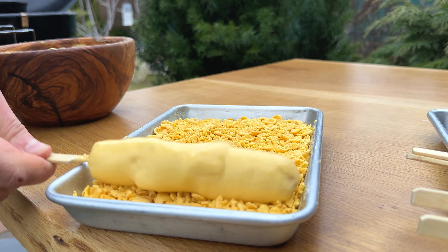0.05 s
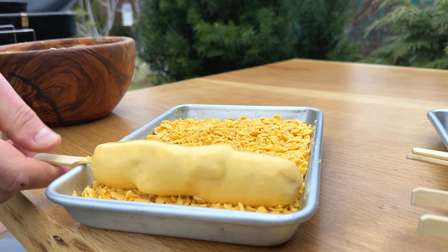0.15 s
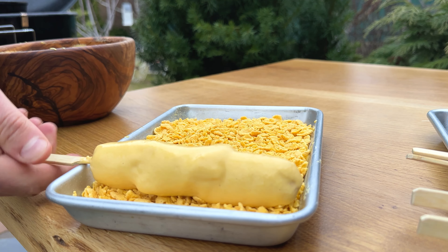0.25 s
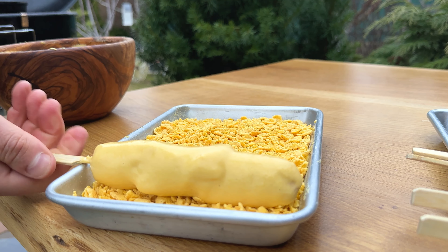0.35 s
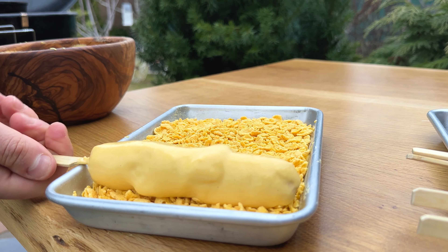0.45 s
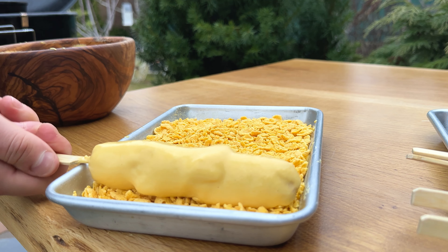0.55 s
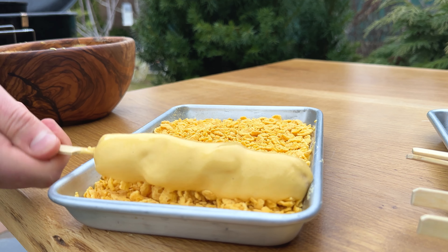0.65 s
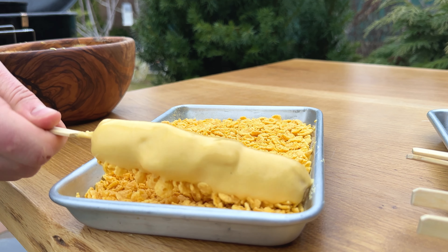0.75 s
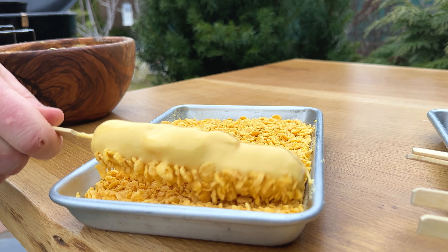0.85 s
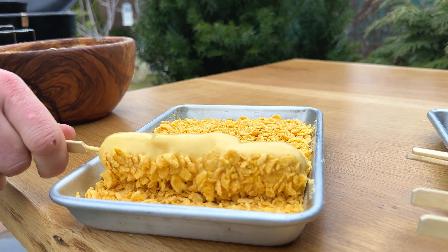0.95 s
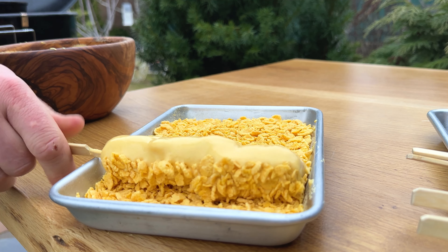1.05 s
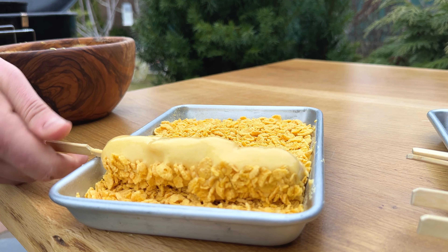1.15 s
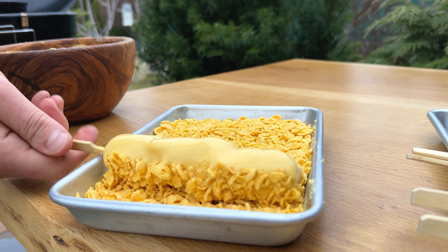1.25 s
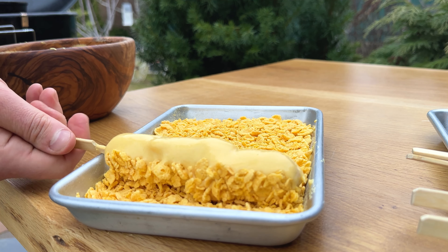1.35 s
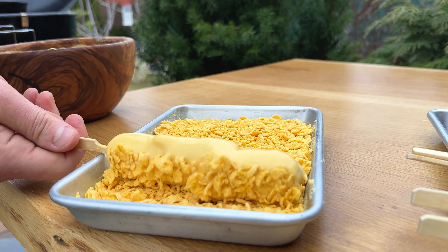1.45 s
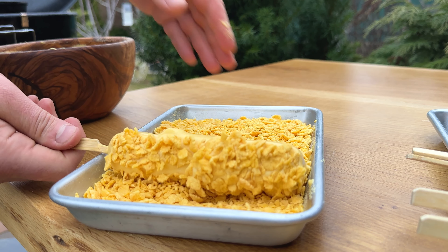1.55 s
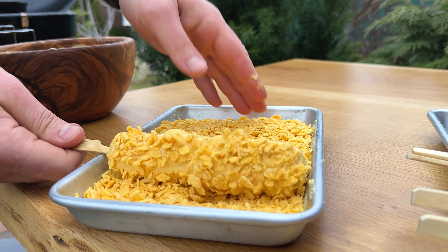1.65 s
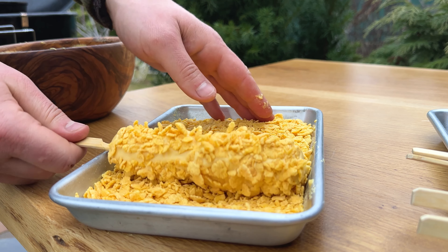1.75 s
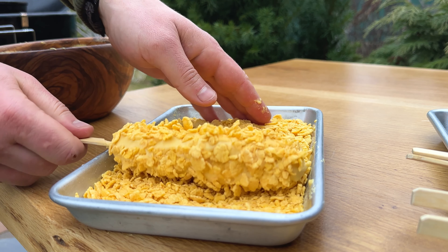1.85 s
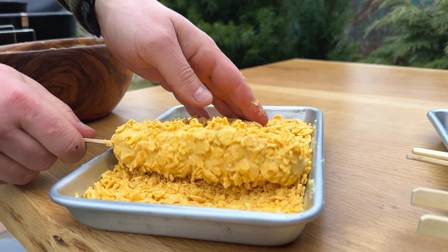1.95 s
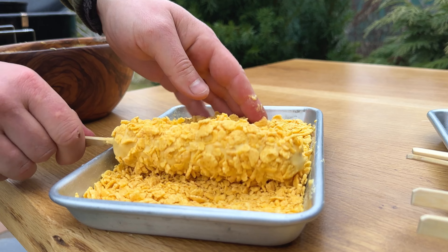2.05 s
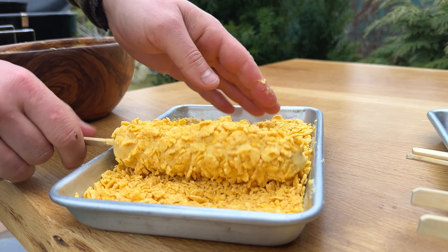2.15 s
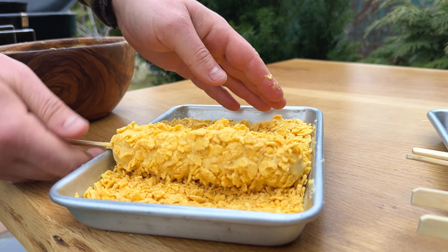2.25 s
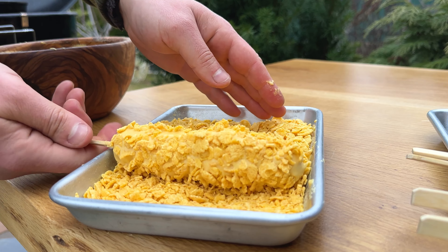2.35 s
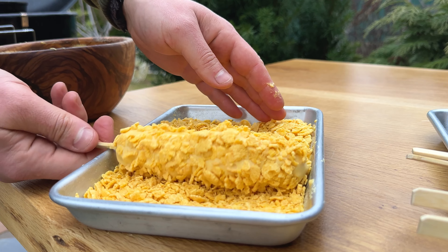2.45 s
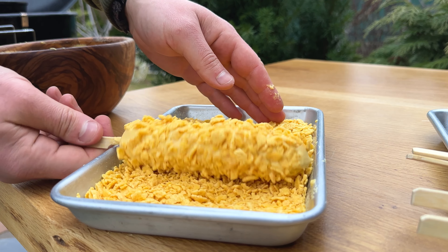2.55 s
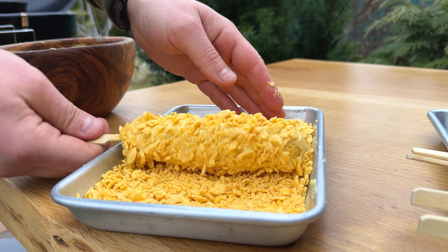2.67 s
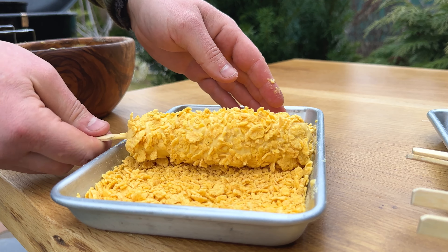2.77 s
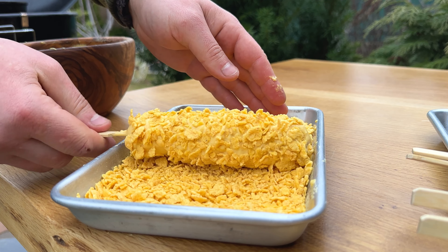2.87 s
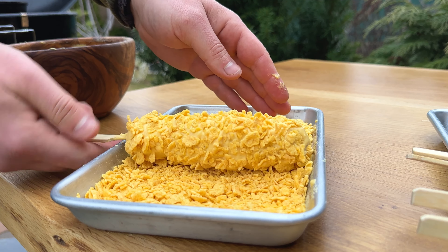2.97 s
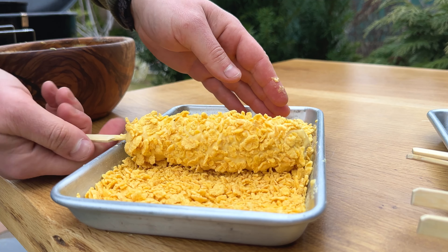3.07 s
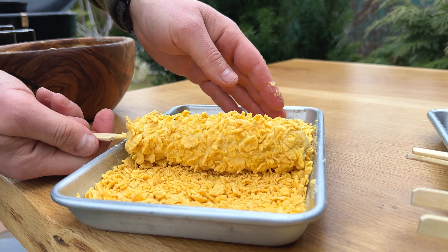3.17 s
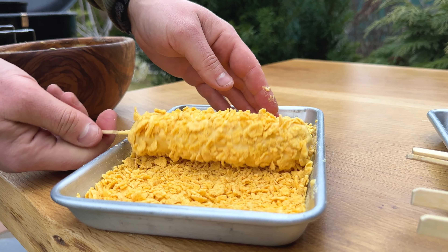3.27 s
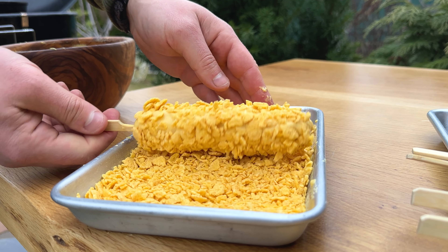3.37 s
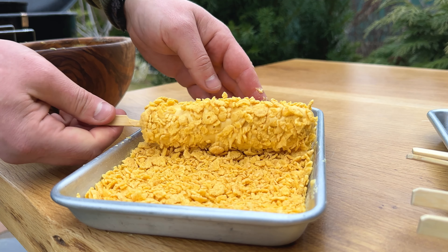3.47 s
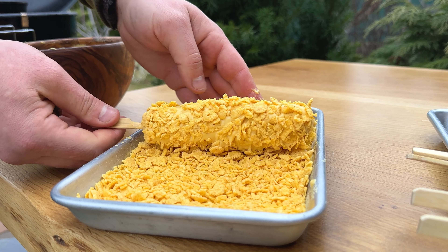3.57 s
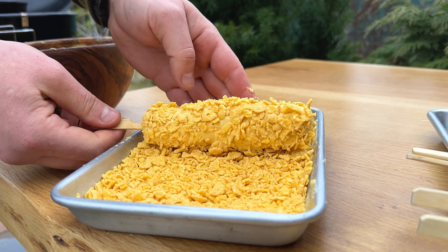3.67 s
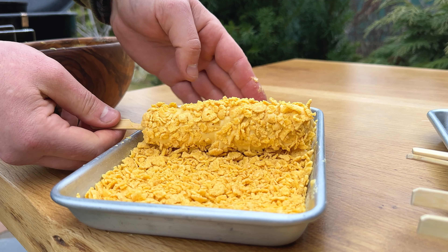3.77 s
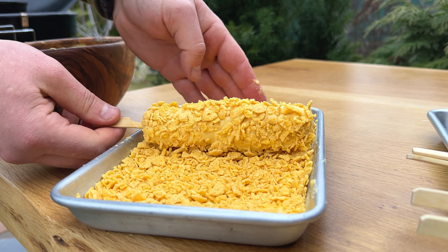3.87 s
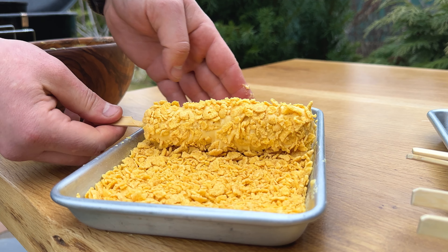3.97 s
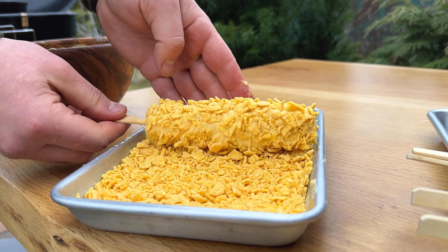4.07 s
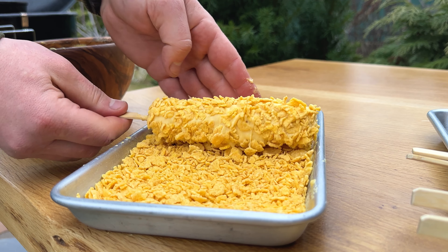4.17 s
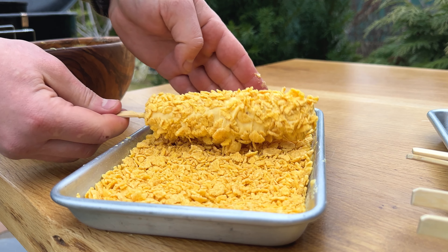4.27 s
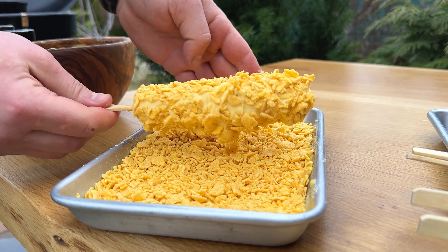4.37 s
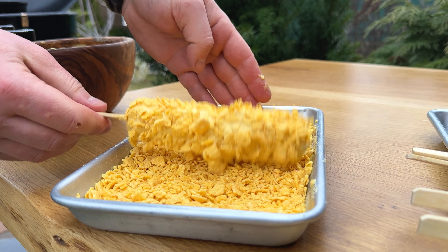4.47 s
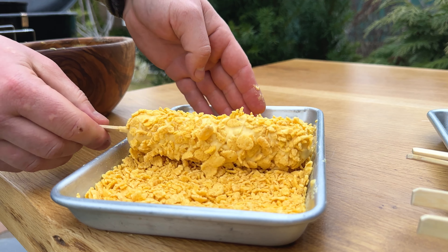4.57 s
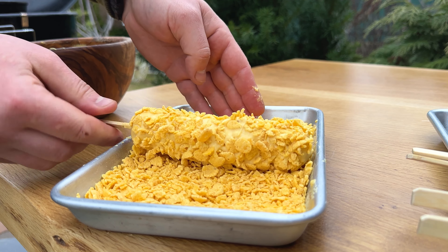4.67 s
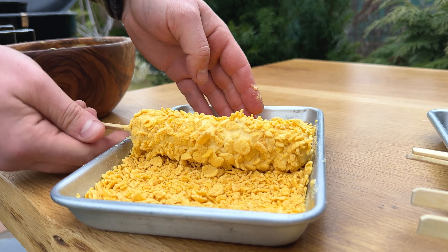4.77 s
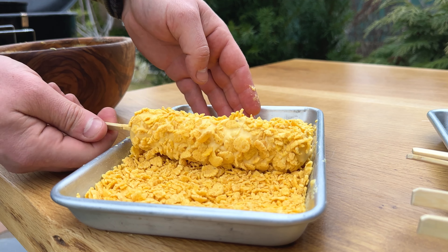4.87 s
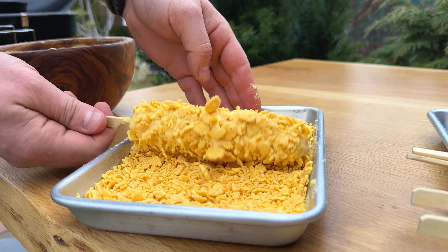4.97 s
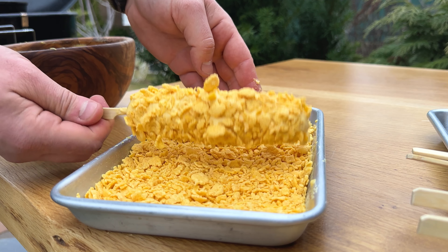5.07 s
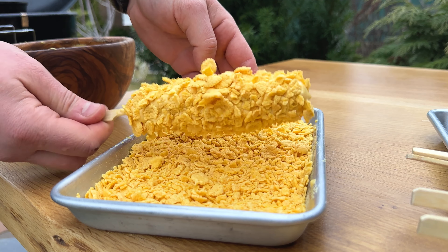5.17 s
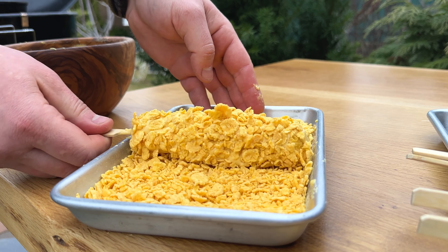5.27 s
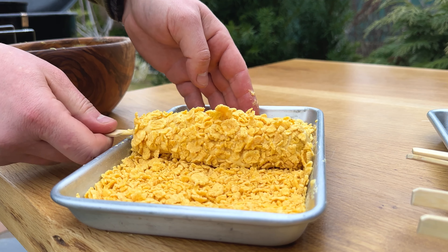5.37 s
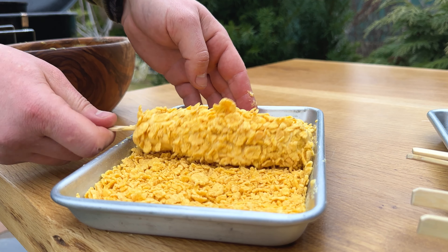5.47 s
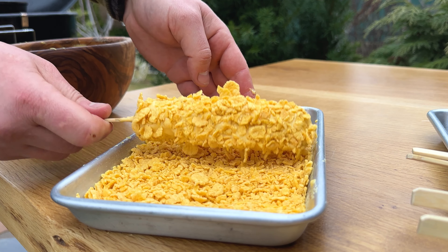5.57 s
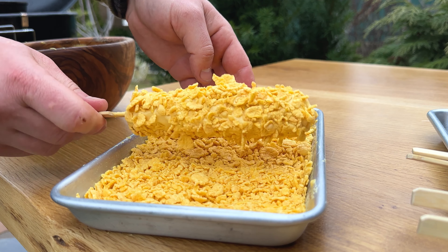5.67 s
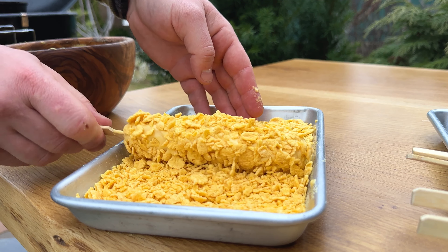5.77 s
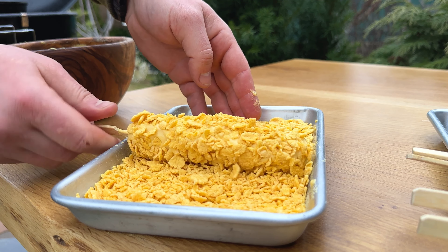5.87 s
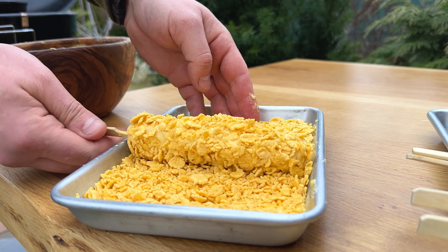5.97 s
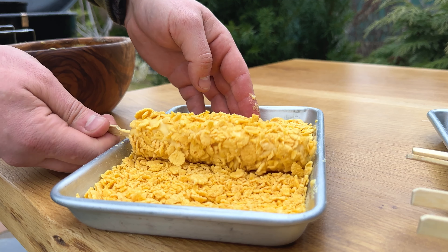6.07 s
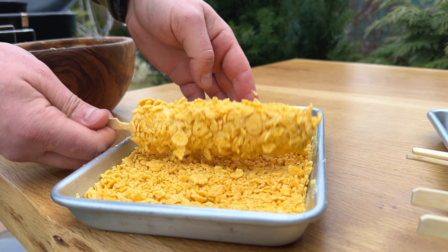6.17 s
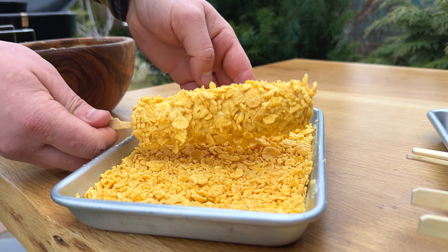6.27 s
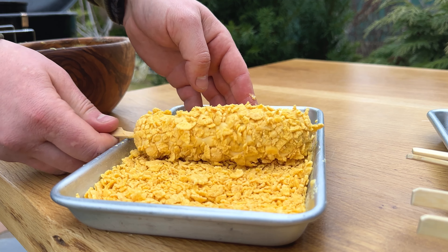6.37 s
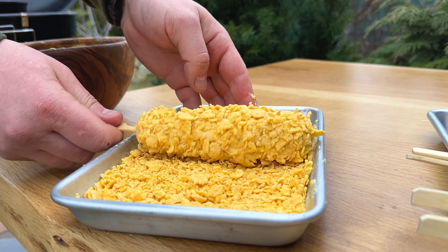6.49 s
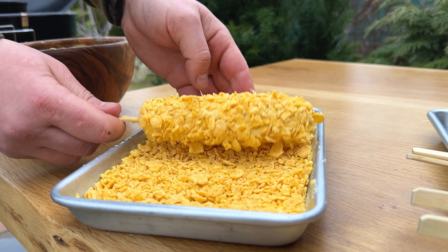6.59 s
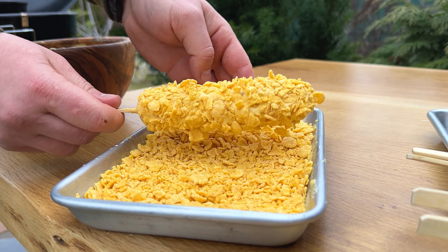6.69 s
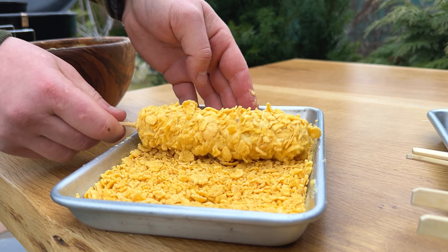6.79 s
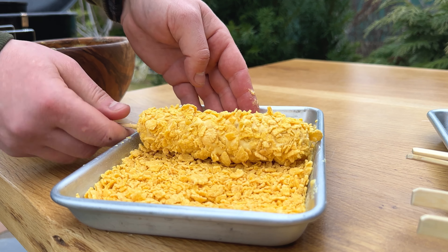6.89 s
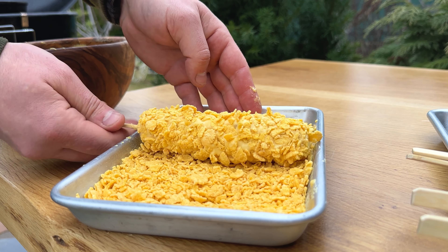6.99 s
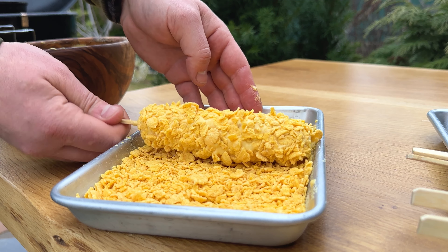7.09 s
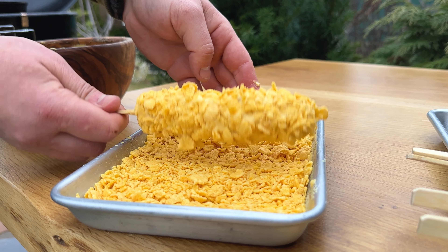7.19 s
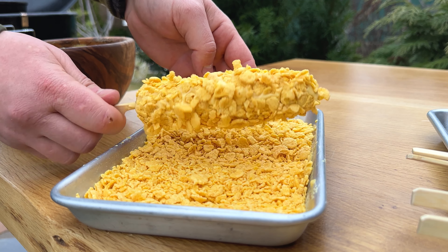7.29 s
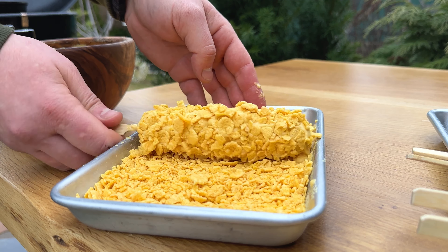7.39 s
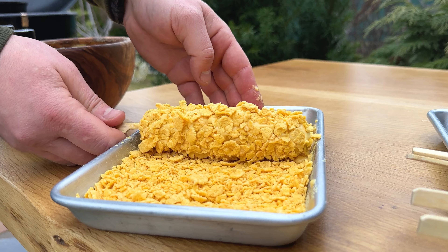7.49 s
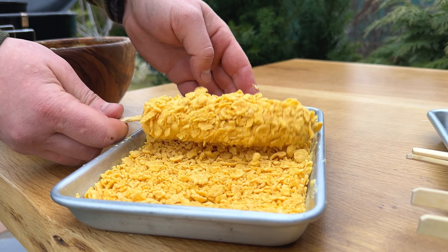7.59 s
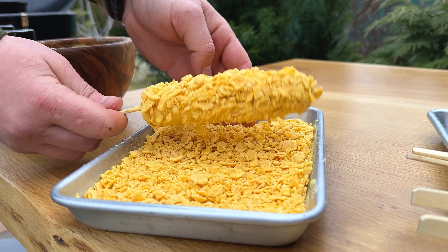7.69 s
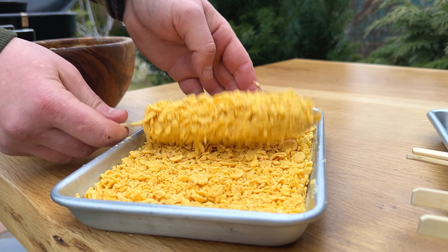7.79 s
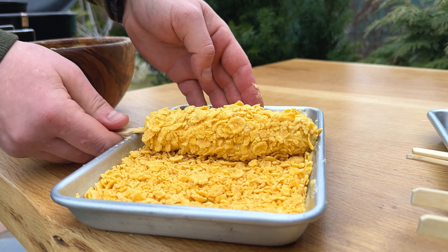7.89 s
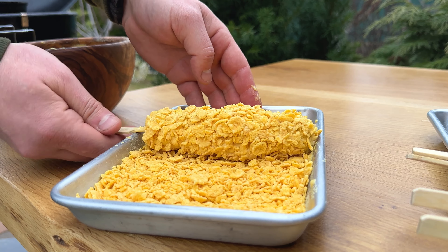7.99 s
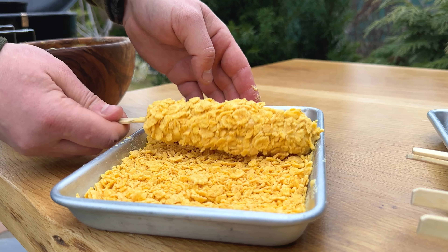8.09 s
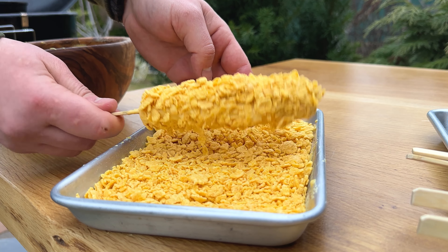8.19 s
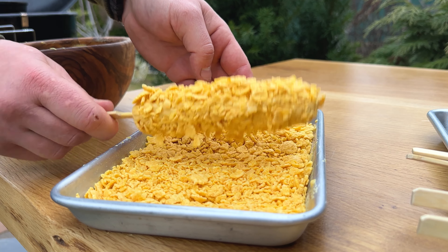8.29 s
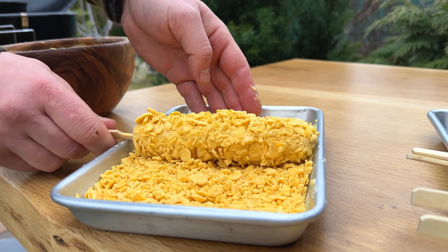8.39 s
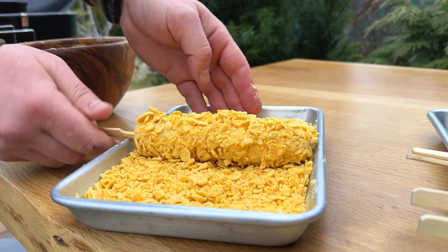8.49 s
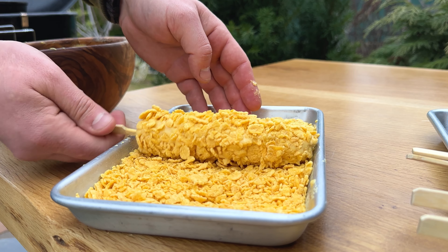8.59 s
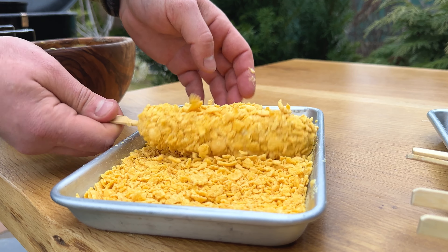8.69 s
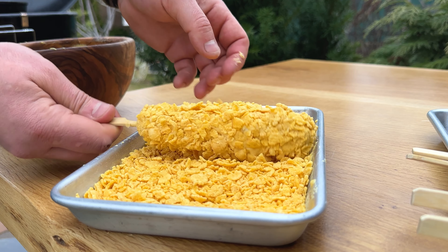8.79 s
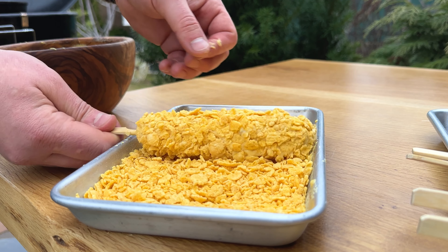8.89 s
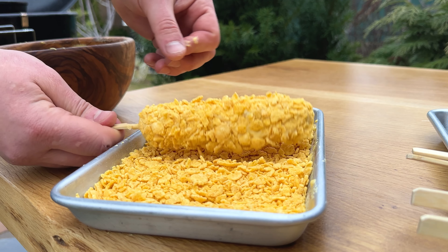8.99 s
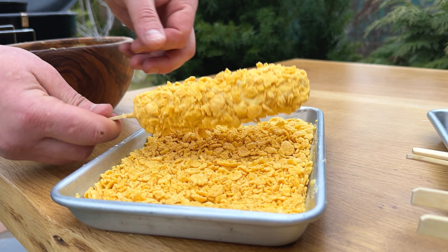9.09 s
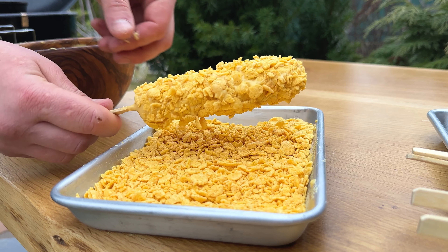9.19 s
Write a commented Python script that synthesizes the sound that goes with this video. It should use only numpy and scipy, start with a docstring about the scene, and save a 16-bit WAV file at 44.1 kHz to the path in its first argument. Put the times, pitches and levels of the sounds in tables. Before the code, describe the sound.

Dry brittle flakes scrape and crackle on a small metal tray on a wooden table. After an opening dab come gentle rolling rustles with pauses, then from the middle on a series of short, bright crunches about half a second or more apart, some with dull knocks. The recording is close and nearly dry, outdoors, over soft air and a low wavering engine hum.

```python
"""A battered sausage on a stick is coated in crushed cornflakes on a metal tray, outdoors.
It opens with a dab and a dull knock of the tray on the wooden table; rolls and nudges then make the flakes
rustle and snap. From 4.5 s dabs follow each other, each crushing a burst of flakes, up to a hard knock at 8.6 s
and two last pushes. A distant engine hums underneath, swelling after 2 s; thin whistles sound near 1, 5.5 and 9 s.
Flakes are random clicks shaped in strength and colour; the tray is blows plus decaying sines."""
import sys
import numpy as np
from scipy import signal
from scipy.fft import rfft, irfft
from scipy.io import wavfile
from scipy.ndimage import uniform_filter1d

SR = 44100
rng = np.random.default_rng(int(sys.argv[2]) if len(sys.argv) > 2 else 0)


def int16_out(signal):
    """Quantize to a 16-bit WAV file."""
    q = np.round(np.clip(np.atleast_2d(signal).T, -1, 1) * 32767)
    wavfile.write(sys.argv[1], SR, q.astype(np.int16))


N = 407484
TIME = np.arange(N) / SR
EDGE_HZ = 16100  # top of the recorded band and pitch of the smallest flakes


def from_db(db):
    """Decibels to an amplitude factor."""
    return 10 ** (np.asarray(db) / 20)


def unit(x):
    """Scales to rms 1."""
    return x / np.sqrt(np.mean(x ** 2) + 1e-20)


def follow(rows, axis=1):
    """One column of a curve, joined by straight lines, at every sample."""
    rows = np.array(rows)
    return np.interp(TIME, rows[:, 0], rows[:, axis])


def add(mix, s, sound):
    """Lays a sound into the mix at s seconds, cut off at the end."""
    part = mix[max(round(s * SR), 0):][:len(sound)]
    part += sound[:len(part)]


def colour(x, spectrum, bumps=(), size=4096):
    """Minimum-phase filter of unit energy with the given spectrum, plus peaks and dips."""
    hz = np.abs(np.fft.fftfreq(size, 1 / SR))
    points, db = np.transpose(spectrum)
    db = np.interp(np.log(hz + 1), np.log(points), db)
    for centre, width, height in bumps:
        db = db + height * np.exp(-((hz - centre) / width) ** 2)
    response = np.exp(np.conj(signal.hilbert(np.log(from_db(db)))))
    taps = np.fft.ifft(response).real[:size // 2]
    return signal.oaconvolve(x, taps / np.linalg.norm(taps))[:N]


def brighten(x, treble_db, split_hz=4500):
    """Lifts the treble by treble_db and lowers the rest by half as much."""
    low = signal.sosfiltfilt(signal.butter(1, split_hz, fs=SR, output="sos"), x)
    return low * from_db(-treble_db / 2) + (x - low) * from_db(treble_db)


def drift(rate_hz):
    """Smooth random wandering of rms 1, fading out above the given rate."""
    hz = np.fft.rfftfreq(N, 1 / SR)
    return unit(irfft(rfft(rng.standard_normal(N)) * np.exp(-(hz / rate_hz) ** 2), N))


def fractures(per_s, spread_db):
    """Random one-sample clicks, mostly small and a few large; rms 1."""
    size = from_db(spread_db * np.minimum(rng.exponential(1, N), 4))
    return unit(size * rng.choice([-1, 1], N) * (rng.random(N) < per_s / SR))


def crumbling(per_s, spread_db, fade_s, even):
    """One flake sets off its neighbours: a gain of sudden, uneven bursts over an even share; rms 1."""
    decay = np.exp(-2 / (fade_s * SR))
    bursts = signal.lfilter([1], [1, -decay], fractures(per_s, spread_db) ** 2)
    return np.sqrt(even + (1 - even) * bursts / bursts.mean())


def loose_flakes(per_s, spread_db, low_hz, cycles, count=16):
    """Clicks that each ring one flake of its own size, very briefly."""
    t, out = np.arange(256) / SR, np.zeros(N)
    clicks, flake = fractures(per_s, spread_db), rng.integers(0, count, N)
    for k, hz in enumerate(np.geomspace(low_hz, EDGE_HZ, count)):
        ring = np.exp(-t * hz / cycles) * np.cos(2 * np.pi * hz * t)
        out += signal.oaconvolve(clicks * (flake == k), unit(ring))[:N]
    return unit(out)


def patchy(x, patchy_db, size=256):
    """Different flakes carry the sound from moment to moment, so its colour shifts in patches."""
    z = signal.stft(x, nperseg=size)[2]
    across_pitch = uniform_filter1d(rng.standard_normal(z.shape), size=5, axis=0)
    patches = unit(uniform_filter1d(across_pitch, size=9, axis=1))
    return signal.istft(z * from_db(patchy_db * patches), nperseg=size)[1][:N]


# colour of breaking and scraping flakes: (f/Hz, level/dB per Hz)
FLAKE_COLOUR = [(100, -9), (300, -15), (700, -7), (1200, 0.5), (1900, -2), (3300, 0), (5000, -4),
                (7000, -6.5), (8800, -2), (10000, -7), (11000, -12.5), (13500, -9)]
# peaks that the tray and table give the flakes: (f/Hz, width/Hz, level/dB)
TRAY_PEAKS = [(1930, 346, 4), (2480, 170, 0), (2770, 44, 4)]


def rustle():
    """Countless flakes scrape past each other and crack in little bursts; some tick out above the rest."""
    ticks = loose_flakes(per_s=1500, spread_db=4.0, low_hz=2370, cycles=0.75)
    grains = fractures(per_s=14000, spread_db=1.5) + from_db(-10.5) * ticks
    grains = patchy(grains, patchy_db=2) * crumbling(per_s=300, spread_db=2.5, fade_s=.0025, even=.5)
    strength, crisp_db = stirring()
    unevenness = from_db(drift(rate_hz=33) + 0.28)
    drive = unit(grains) * strength * sticking() * unevenness
    return colour(brighten(drive, crisp_db), FLAKE_COLOUR, TRAY_PEAKS)


PUSH_SHAPE = 1.15  # 1 = pointed, 2 = rounded


def push(t, s, db, rise, fall):
    """Strength of one movement: it builds up to the moment s and dies away."""
    return from_db(db) * np.exp(-np.abs((t - s) / np.where(t < s, rise, fall)) ** PUSH_SHAPE)


# the sausage is rolled or pushed through the flakes, timed at the hardest push:
# (t/s, level/dB, rise/s, fall/s, treble lift/dB)
ROLLS = [(.7, -56.5, 0.13, 0.09, 5), (1.013, -44.5, 0.19, 0.062, -2.5), (1.512, -41, 0.077, 0.057, -5),
         (1.864, -34, 0.049, 0.076, -1.5), (2.028, -40, 0.22, 0.082, 0.5), (2.191, -46.5, 0.09, 0.11, -3),
         (2.548, -41.5, 0.099, 0.29, -4), (3.329, -40, 0.062, 0.069, -3), (3.576, -38.5, 0.16, 0.11, -1.5),
         (4.02, -40.5, 0.19, 0.11, -1), (4.959, -43, 0.082, 0.029, -0.5), (5.41, -47.5, 0.079, 0.095, -2),
         (6.03, -49.5, 0.15, 0.096, 0), (6.5, -51, 0.076, 0.11, -1.5), (7.559, -44.5, 0.032, 0.057, 2.5),
         (8.662, -34, 0.028, 0.051, 2), (8.91, -44, 0.047, 0.044, 2)]
# short nudges of the stick or fingers: (t/s, level/dB)
NUDGES = [(.445, -55.5), (0.608, -45), (1.267, -46.5), (1.73, -40), (2.391, -50), (2.74, -40), (2.954, -48),
          (3.115, -48.5), (3.648, -36.5), (4.616, -43), (6.911, -48.5), (7.006, -48), (7.07, -52.5),
          (7.491, -47.5), (8.057, -45), (8.82, -57)]
NUDGE_RISE_S, NUDGE_FALL_S, NUDGE_TREBLE_DB = 0.018, 0.028, -1
# after each dab the bed gives way under the weight
SINK_RISE_S, SINK_FALL_S, SINK_LAG_S, SINK_TREBLE_DB = 0.008, 0.072, 0.014, -1.5
# the bed creeps faintly under the resting sausage, duller while the batter is still bare
CREEP_DB, CREEP_TREBLE_DB, BATTER_TREBLE_DB, COATING_S = -64, -5.5, -11.5, 0.61
LIFT_S, LET_GO_S = 0.19, 8.97  # time in the air before each dab; moment the hand leaves


def stirring(size=64):
    """Strength and crispness of the sliding flakes, summed by power over rolls, nudges, sinking and creep."""
    t = TIME[::size]
    moves = [(push(t, s, db, rise, fall), treble_db) for s, db, rise, fall, treble_db in ROLLS]
    moves += [(push(t, s, db, NUDGE_RISE_S, NUDGE_FALL_S), NUDGE_TREBLE_DB) for s, db in NUDGES]
    resting = t < LET_GO_S
    for s, *_, sink_db in DABS:
        sinking = push(t, s + SINK_LAG_S, sink_db, SINK_RISE_S, SINK_FALL_S)
        moves.append((sinking, SINK_TREBLE_DB))
        resting = resting & ((t < s - LIFT_S) | (t > s))
    # the creep is weaker while the sausage is lifted or the hand has gone
    creep = from_db(CREEP_DB) * uniform_filter1d(np.where(resting, 1, from_db(-6.5)), size=40)
    bare = np.exp(-(t / COATING_S) ** 2)
    moves.append((creep, CREEP_TREBLE_DB + BATTER_TREBLE_DB * bare))
    power = sum(strength ** 2 for strength, _ in moves)
    crisp_db = sum(strength ** 2 * treble_db for strength, treble_db in moves) / power
    return np.interp(TIME, t, np.sqrt(power)), np.interp(TIME, t, crisp_db)


# the sausage sticks between strokes, then breaks loose at t: (t/s, length of the halt/s, level/dB)
HALTS = [(2.355, 0.056, -5.5), (2.935, 0.22, -5.5), (3.1, 0.082, -8), (3.195, 0.061, -8), (5.245, 0.28, -6)]


def sticking():
    """Friction brings the sausage to rest gradually and lets it go at once."""
    dip_db = 0
    for s, length, depth_db in HALTS:
        slowing = np.clip(2 * (1 - (s - TIME) / length), 0, 1)
        dip_db = dip_db + depth_db * slowing * (TIME < s)
    return from_db(dip_db)


# the sausage lands in the flakes, timed at the peak:
# (t/s, level/dB, rise/s, fall/s, treble lift/dB, level/dB of the sinking after it)
DABS = [(0.0678, -25, 0.0095, 0.0076, -1.5, -44), (4.505, -21.5, 0.011, 0.0049, -1, -42),
        (5.2617, -18.5, 0.0054, 0.0051, 2.5, -48.5), (5.763, -24.5, 0.0069, 0.0062, 2.5, -42),
        (6.345, -22, 0.0076, 0.0069, 4.5, -43), (6.78, -25.5, 0.0096, 0.011, 0.5, -40.5),
        (7.387, -22.5, 0.0045, 0.011, 0.5, -47), (7.8219, -17.5, 0.0065, 0.0071, -1.5, -40),
        (8.356, -19, 0.0057, 0.0092, 1.5, -46)]
# the tray's floor resounds under a dab: (f/Hz, width/Hz, level/dB)
DAB_RING = [(650, 490, -2.5), (1870, 120, 5.5), (2680, 130, 3.5), (3970, 260, 4)]
# slight treble dip of breaking flakes: (f/Hz, width/Hz, level/dB)
BREAK_DIP = [(14470, 4800, -1)]


def dabs():
    """Ever more flakes break as the sausage sinks in, until the bed stops it."""
    out, t = np.zeros(N), np.arange(-SR // 25, SR // 12) / SR
    grains = fractures(per_s=30000, spread_db=1.2)
    grains = grains * crumbling(per_s=700, spread_db=1.4, fade_s=.001, even=.55)
    for s, db, rise, fall, treble_db, _ in DABS:
        load = np.exp(-np.abs(t / np.where(t < 0, rise, fall)) ** 1.49)
        settling = from_db(-20.0) * np.exp(-np.abs(t) / 0.012) * (t > 0)
        chosen = np.take(grains, round(s * SR) + np.arange(len(t)), mode="wrap")
        burst = chosen * (load + settling)
        first_touch_db = 3 * np.clip(-t / rise, 0, 2)  # thin edges break first and sound brighter
        add(out, s + t[0], from_db(db) * brighten(burst, treble_db + first_touch_db))
    return colour(out, FLAKE_COLOUR, DAB_RING + BREAK_DIP)


# single flakes snap: (t/s, relative level/dB)
SNAPS = [(.141, -35), (.618, -40), (1.835, -26), (1.853, -24), (1.905, -30), (1.934, -30), (2.116, -37),
         (3.103, -37), (3.563, -25), (3.612, -28), (3.64, -24), (4.249, -45), (4.322, -40.5),
         (4.369, -40.5), (4.475, -37), (4.538, -29), (5.154, -49.5), (5.657, -43), (5.906, -35),
         (6.321, -35), (6.729, -42.5), (6.775, -18.5), (7.171, -48.5), (7.3748, -20), (7.3799, -16),
         (7.74, -48), (7.8, -35), (8.039, -33), (8.143, -49.5), (8.189, -49), (8.34, -38)]
# flakes snap brightly in a still bed and dully when buried in one stirred up to BURIED_DB
SNAP_TREBLE_DB, BURIED_TREBLE_DB, BURIED_DB = 12, 1, -47.5


def snaps():
    """A crack runs through one flake in milliseconds; crumbs drop off the coat as finer clicks."""
    out, t = np.zeros(N), np.arange(SR // 80) / SR
    buried = np.minimum(stirring()[0] / from_db(BURIED_DB), 1) ** 2
    for s, db in SNAPS:
        fade = np.exp(-t / 0.0024) + 0.11 * np.exp(-t / 0.0091)
        crack = fade * rng.choice([-1, 1], len(t)) * (t > 0)
        treble_db = SNAP_TREBLE_DB + (BURIED_TREBLE_DB - SNAP_TREBLE_DB) * buried[round(s * SR)]
        add(out, s, from_db(db - 9) * brighten(crack, treble_db))
    crumbs = shedding() * fractures(per_s=45, spread_db=3.2)
    crumbs = brighten(crumbs, SNAP_TREBLE_DB, split_hz=6300)
    return colour(out + crumbs, FLAKE_COLOUR, TRAY_PEAKS + BREAK_DIP)


# loose crumbs drop off the coat once it has been turned
SHED_START_S, SHED_DB, TRICKLE_FADE_S = 3.2, -69.5, 4.1


def shedding():
    """Strength of the falling crumbs: a fading trickle that ends when the hand leaves."""
    age = np.maximum(TIME - SHED_START_S, 0)
    return from_db(SHED_DB) * np.exp(-age / TRICKLE_FADE_S) * (age > 0) * (TIME < LET_GO_S)


# the tray rocks against the table: (t/s, relative level/dB, hardness of the contact as a cut-off f/Hz)
KNOCKS = [(0.135, -19, 1580), (.143, -29, 1100), (1.0536, -20, 1870), (1.071, -23.5, 900),
          (1.2583, -28.5, 1820), (2.483, -26.5, 600), (5.266, -14.5, 300), (5.7805, -22, 1720),
          (5.798, -25, 1100), (7.397, -18.5, 420), (7.418, -19.5, 1210), (7.8531, -21.5, 1880),
          (8.4211, -19, 2000), (8.6017, -7.5, 3200)]
# what the loaded tray rings with: (f/Hz, level/dB, time to fall by 60 dB/s)
TRAY_MODES = [(130.7, -23, 0.23), (423, -27.5, 0.1), (722, -23.5, 0.055), (904, -17.5, 0.075),
              (1305, -18, 0.022), (1530, -15.5, 0.014), (2000, -15.5, 0.032), (2750, -17, 0.028)]
# the broad knock of tray on wood: (f/Hz, level/dB per Hz)
KNOCK_COLOUR = [(80, -21), (500, -10.5), (830, 6), (1040, -4), (1250, 4.5), (1550, 0), (2800, -10),
                (5000, -16.5)]


def tray():
    """Each knock is a short blow and a chatter of the rim, with a ring that the flakes damp."""
    out, t = np.zeros(N), np.arange(SR // 4) / SR
    ring = sum(from_db(db - 60 * t / t60) * np.sin(2 * np.pi * hz * t) for hz, db, t60 in TRAY_MODES)
    poles = signal.butter(2, 1400, fs=SR)[1]
    for s, db, hard_hz in KNOCKS:
        chatter = from_db(-33) * np.exp(-t / 0.011) * rng.standard_normal(len(t))
        blow = from_db(10.5) * colour((t == 0) + chatter, KNOCK_COLOUR)[:len(t)]
        for _ in range(2):  # two all-passes: in sheet metal the treble runs ahead of the bass
            blow = signal.lfilter(poles[::-1], poles, blow)
        soften = signal.butter(2, min(hard_hz, SR / 3), fs=SR)  # a soft contact misses the treble
        thin_hz = 600 * min(hard_hz / 3200, 2) ** 3  # a hard one misses the bass
        thin = signal.butter(1, thin_hz, "highpass", fs=SR)
        knock = signal.lfilter(*thin, signal.lfilter(*soften, blow + ring))
        add(out, s, from_db(db) * knock)
    return out


# the fingertips scrape through the tray: (t/s, level/dB, fade/s, f/Hz)
SCUFFS = [(1.698, -41, 0.055, 5040), (3.835, -48.5, 0.098, 9300)]


def scuffs():
    """Each fingertip scrape is a short, bright band of noise that dies away."""
    out = np.zeros(N)
    for s, db, fade, hz in SCUFFS:
        t = np.maximum(TIME - s, 0)
        band = signal.butter(1, [hz * .92, hz / .92], "bandpass", fs=SR)
        scrape = unit(signal.lfilter(*band, rng.standard_normal(N)))
        out += from_db(db) * scrape * (t > 0) * np.exp(-(t / fade) ** 2)
    return out


def thump(s=5.935, db=-51, fade_s=0.022):
    """A soft, low bump of decaying noise, likely a hand against the table."""
    t = np.maximum(TIME - s, 0)
    band = signal.butter(4, [170, 450], "bandpass", fs=SR, output="sos")
    noise = rng.standard_normal(N)
    bump = signal.sosfilt(band, noise * (t > 0) * np.exp(-t / fade_s))
    return from_db(db) * bump / signal.sosfilt(band, noise).std()


# the distant engine: (t/s, f/Hz, relative level/dB)
ENGINE = [(0.0, 65, -58), (0.98, 56.2, -77), (1.29, 58.9, -60.5), (1.98, 60.35, -56), (2.21, 75.7, -52.5),
          (2.31, 83.1, -54.5), (2.49, 84.6, -52.5), (2.88, 80.05, -48), (2.96, 78.7, -64), (3.12, 79, -63),
          (3.2, 79.1, -48.5), (4.84, 83.5, -48.5), (5.14, 89.2, -48), (5.76, 91, -49), (7.13, 83, -56.5),
          (8.34, 83.2, -64), (8.8, 85.4, -56.5), (9.24, 86.5, -65)]
# its lines: (multiple of the pitch, level/dB)
ENGINE_LINES = [(.5, -21), (1, 0), (1.5, -14), (2, -27)]
# its rumble: (f/Hz, level/dB per Hz)
RUMBLE = [(25, -48), (45, -3), (125, 0), (200, -13), (400, -16.5), (1100, -11.5), (2000, -31),
          (5000, -35.5)]
ENGINE_DB = 0.2  # added to the whole level curve


def engine():
    """Low exhaust lines that waver, over a rumble that follows the load."""
    pitch_hz = follow(ENGINE) * (1 + .004 * drift(rate_hz=8))
    turns = np.cumsum(pitch_hz) / SR
    lines = np.zeros(N)
    for multiple, db in ENGINE_LINES:
        waver = 1 + .1 * drift(rate_hz=4)
        lines += from_db(db) * np.sin(2 * np.pi * multiple * turns) * waver
    rumble = colour(rng.standard_normal(N), RUMBLE)
    load = from_db(follow(ENGINE, axis=2) + ENGINE_DB)
    return load * (unit(lines) + from_db(-12) * rumble)


# faint far-off whistles, likely birds: (t/s, length/s, starting f/Hz, relative level/dB)
BIRDS = [(1.083, .12, 4470, -63), (5.462, .33, 4400, -63), (5.553, 0.045, 5600, -66),
         (8.989, 0.25, 2875, -73.5)]
BIRD_SAG = 0.035  # share of the pitch lost in a note


def birds():
    """Thin, fluttering sine whistles that fall in pitch."""
    out, waver = np.zeros(N), 1 + .026 * drift(rate_hz=400)
    flutter = from_db(4 * drift(rate_hz=40) - 1)
    for s, length, hz, db in BIRDS:
        u = np.linspace(0, 1, round(length * SR))  # progress through the note
        turns = np.cumsum(hz * (1 - BIRD_SAG * u) * waver[:len(u)]) / SR
        add(out, s, from_db(db) * np.sin(np.pi * u) * np.sin(2 * np.pi * turns))
    return out * flutter


# the garden's quiet air: (f/Hz, level/dB per Hz)
AIR = [(25, -38), (42, -16), (60, 11), (130, 3), (250, -4.5), (1000, -10), (2200, -14), (2750, -14.5),
       (3500, -24.5), (9000, -21.5), (11000, -55)]


def air():
    """Quiet outdoor background of coloured noise, swelling a little."""
    return from_db(-63 + 1.0 * drift(rate_hz=1.5)) * colour(rng.standard_normal(N), AIR)


def garden(x, wet_db=-19, t60=0.26, dull_hz=4000):
    """Weak, dull scatter from the table, house wall and hedge, as a decaying noise tail."""
    t = np.arange(SR // 2) / SR
    tail = rng.standard_normal(len(t)) * from_db(-60 * t / t60) * (t > .004)
    tail = signal.lfilter(*signal.butter(1, dull_hz, fs=SR), tail / np.linalg.norm(tail))
    return x + from_db(wet_db) * signal.oaconvolve(x, tail)[:N]


def scene():
    """Flakes, tray, hands and birds scatter in the garden; engine and air lie beneath."""
    hands = scuffs() + thump()
    near = rustle() + hands + dabs() + snaps() + tray()
    return (garden(near + birds()) + engine() + air())[None]


def record(dry):
    """The microphone's low cut, then the recorder's band limit."""
    dry = signal.sosfilt(signal.butter(6, 37, "highpass", fs=SR, output="sos"), dry)
    band_limit = signal.firwin(301, EDGE_HZ, window=("kaiser", 9), fs=SR)
    return signal.oaconvolve(dry, band_limit[None], "same")


dry = scene()
out = record(dry)
int16_out(out)
```